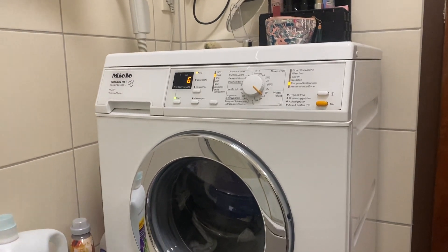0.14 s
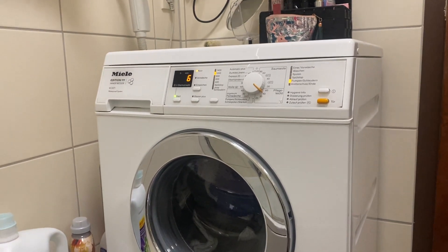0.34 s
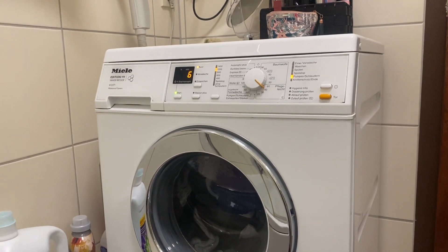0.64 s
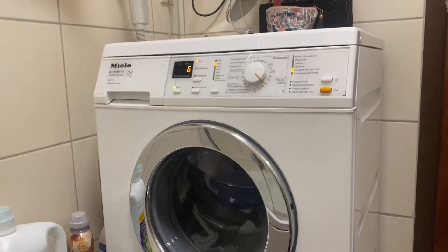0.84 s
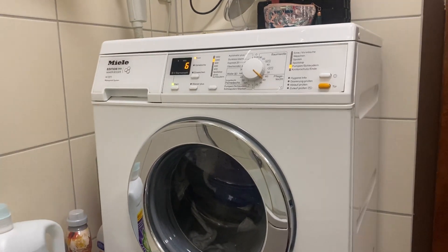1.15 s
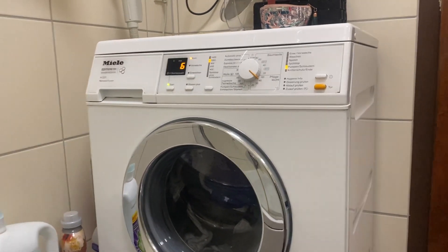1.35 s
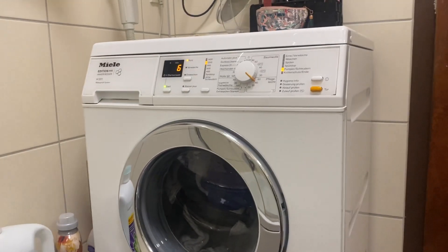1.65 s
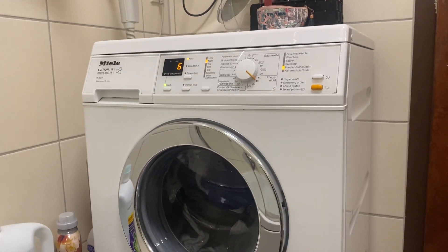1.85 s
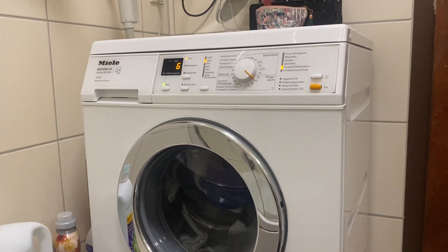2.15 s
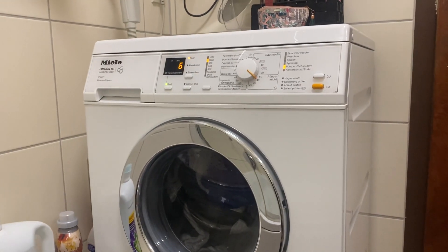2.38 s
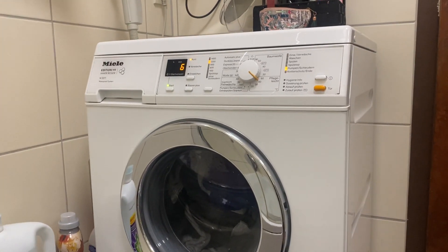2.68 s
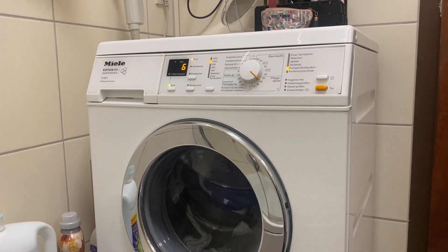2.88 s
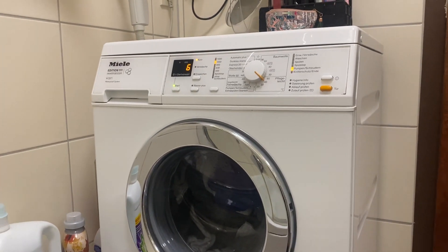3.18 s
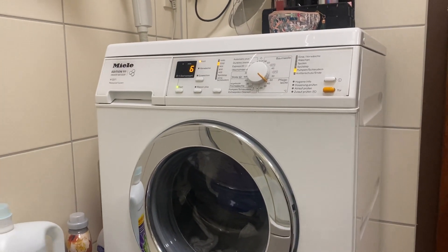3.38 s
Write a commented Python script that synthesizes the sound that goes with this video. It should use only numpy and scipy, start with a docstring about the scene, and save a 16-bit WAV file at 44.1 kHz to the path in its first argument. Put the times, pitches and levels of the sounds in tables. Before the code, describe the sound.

Washing machine drain pump hums and slurps in uneven gulps, then settles into a steady louder whir

```python
"""Washing machine pumping out

A washing machine pumps out its water in a small tiled room, a step from the microphone pair.
The drain pump hums in sine tones at multiples of the mains and slurps air in uneven gulps of shaped noise.
About halfway it draws air all the time: the hum jumps an octave and the churning becomes a steady whir.
Filtered noise makes the flow, the rumble, one dull knock and a thin hiss on the right."""
import sys
import numpy as np
from scipy import signal
from scipy.fft import rfft, irfft
from scipy.io import wavfile

SR = 44100
rng = np.random.default_rng(int(sys.argv[2]) if len(sys.argv) > 2 else 0)


def generate_wav(sig):
    """Save sig (samples, or channels by samples) to the path in sys.argv[1] as 16-bit PCM at SR."""
    pcm = np.round(np.clip(np.atleast_2d(sig).T, -1, 1) * 32767).astype(np.int16)
    wavfile.write(sys.argv[1], SR, pcm)


N = 155232

# Tone of the bright spray off the impeller. Each row: frequency in Hz, relative level in dB.
SPRAY_TONE = [(600, -28), (1500, -2), (2400, 0), (3200, -1), (4300, -8), (5500, -18.5), (7000, -23),
              (10000, -51.5)]


def amp(db):
    """Decibels to gain."""
    return 10 ** (np.asarray(db) / 20)


def unit(x):
    """Scales to rms 1, taken over both channels of a pair."""
    return x / np.sqrt(np.mean(x ** 2) + 1e-20)


def clock():
    """Time of every sample in seconds."""
    return np.arange(N) / SR


def bins():
    """Frequency of every spectrum bin in Hz."""
    return np.fft.rfftfreq(N, 1 / SR)


def curve(rows):
    """Joins (seconds, value) rows by straight lines."""
    return np.interp(clock(), *np.transpose(rows))


def spectrum(rows):
    """Reads (Hz, value) rows at every bin, along a logarithmic frequency axis."""
    hz, value = np.transpose(rows)
    return np.interp(np.log(bins() + 1), np.log(hz + 1), value)


def drift(rate_hz):
    """Slow random movement of rms 1: noise with a Gaussian low-pass and no constant part."""
    f = bins()
    slow = rfft(rng.standard_normal(N)) * np.exp(-(f / rate_hz) ** 2) * (f > 0)
    return unit(irfft(slow, N))


def swell(t, start, rise, hold, fade):
    """Rises in a straight line, holds, then dies away exponentially (all in seconds)."""
    attack = np.clip((t - start) / rise, 0, 1)
    return attack * np.exp(-np.maximum(t - start - rise - hold, 0) / fade)


def room(x):
    """Adds the dense, short reflections of the tiles as a decaying noise tail."""
    t60_s, tail_db = 0.24, 2.5
    t = np.arange(SR // 2) / SR
    tail = rng.standard_normal(len(t)) * amp(-60 * t / t60_s)
    reflections = amp(tail_db) * rfft(tail / np.linalg.norm(tail), N)
    return irfft(rfft(x) * (1 + reflections), N)


def radiate(pair, tone_rows):
    """Two unrelated signals pass the resonant cabinet and reach the two microphones, partly alike."""
    # Cabinet resonances. Each row: frequency in Hz, width in Hz, lift in dB.
    cabinet = [(426.7, 6.5, 6), (544, 13, 2), (680.5, 13, 7.5), (818.6, 18, 9), (896, 10, 1.5),
               (928, 17, 5), (949, 20, 6), (1063.4, 15, 9), (1194, 18, 5), (1309, 21, 7.5), (1354, 11, 6.5),
               (1540, 11, 3.5), (1602, 13, 8), (1824, 12, 4.5), (2150, 36, 2.5), (2396, 51, 6.5),
               (3093, 76, 7)]
    # How alike the microphones hear. Each row: frequency in Hz, likeness (limited to 0..1 below).
    likeness = [(60, 0), (220, 1.3), (400, 0.43), (730, 0.83), (1100, 0.5), (1600, 0.37), (4500, 0.49),
                (6700, 0.14), (9000, 0)]
    # Phase between the microphones. Each row: frequency in Hz, lead of the left in radians.
    left_lead = [(40, 0), (120, -1.43), (200, 0.4), (420, -0.5), (600, -2.5), (950, -5), (1380, -4.5),
                 (1850, -6.5), (2400, -8), (3000, -4), (3900, -5.5), (5100, -5), (6400, -1), (7100, 1.6),
                 (8000, 3.2), (10000, 4)]
    # Balance of the microphones. Each row: frequency in Hz, left over right in dB.
    balance = [(60, -9.5), (120, -0.5), (250, -5), (510, -6), (1050, -4), (2140, -5.5), (4370, -2.5),
               (8940, -0.5)]
    f = bins()
    ring_db = sum(db / (1 + (2 * (f - hz) / width) ** 2) for hz, width, db in cabinet)
    first, second = rfft(pair)
    same = np.clip(spectrum(likeness), 0, 1)
    left = same * first + np.sqrt(1 - same ** 2) * second
    left = left * np.exp(1j * spectrum(left_lead))
    lean = amp(spectrum(balance) / 2)
    stereo = np.array([left * lean, first / lean])
    return unit(irfft(stereo * amp(spectrum(tone_rows) + ring_db), N))


def sway(share):
    """Left and right gains as the hand-held microphone moves through the room's standing waves."""
    # Each row: time in seconds, left over right in dB at full share.
    sway_rows = [(0, 0), (.8, -2), (1.6, -5), (2.25, -4), (2.9, 1.2), (3.52, 2.5)]
    return amp(share * curve(sway_rows) * np.array([[.5], [-.5]]))


def splashes(per_s, spread_db, wash):
    """Tiny bursts of bubbles: random single-sample clicks over an even wash of noise, in the room."""
    size = amp(spread_db * np.minimum(rng.exponential(1, N), 3))
    clicks = rng.choice([-1, 1], N) * (rng.random(N) < per_s / SR)
    bursts = unit(size * clicks)
    return unit(room(bursts + wash * rng.standard_normal(N)))


def hiss():
    """A thin steady hiss on the right: unrelated high noise, 22 dB weaker on the left."""
    # Each row: frequency in Hz, relative level in dB.
    hiss_tone = [(7800, -52.5), (8030, 3.5), (8500, -2), (9200, -13.5), (10000, -32.5), (12000, -49.5)]
    right_db = -82.5
    noise = irfft(rfft(rng.standard_normal((2, N))) * amp(spectrum(hiss_tone)), N)
    return amp(right_db + np.array([[-22], [0]])) * unit(noise)


def water():
    """Even flow through the hose and lumpy rumble in the sump, both noise of wavering level."""
    # Tone of the flow. Each row: frequency in Hz, relative level in dB.
    flow_tone = [(20, -24), (60, 9), (120, 6), (230, 4), (350, 1.5), (520, -1), (700, -2.5), (1100, -3.5),
                 (1800, -11.5), (3100, -15), (4400, -17.5), (5500, -24.5), (7000, -33), (9500, -48.5),
                 (12000, -55.5)]
    # Tone of the rumble. Each row: frequency in Hz, relative level in dB.
    rumble_tone = [(20, -27), (45, -23), (70, -7), (120, 8), (170, -4.5), (240, -9.5), (320, -1.5),
                   (450, -6), (600, -8.5), (1000, -19), (3000, -70.5)]
    # Low rumble over time. Each row: time in seconds, level in dB before the wavering.
    rumble_rows = [(0, -50.5), (.2, -56), (.44, -54), (.66, -60), (.85, -47), (1.0, -52), (1.12, -55.5),
                   (1.28, -51.5), (1.45, -58), (1.65, -63.5), (1.82, -53), (1.91, -54.5), (2.03, -47),
                   (2.3, -46), (2.8, -45), (3.05, -46.5), (3.3, -45.5), (3.52, -50.5)]
    flow_gain = amp(-57.5 + 0.78 * drift(48))
    flow = flow_gain * radiate(rng.standard_normal((2, N)), flow_tone)
    rumble_gain = amp(curve(rumble_rows) + 1.5 * drift(20))
    rumble = rumble_gain * radiate(rng.standard_normal((2, N)), rumble_tone)
    return flow + rumble


def knock():
    """One dull thud of water in the pump: noise that starts at once and dies in milliseconds."""
    # Each row: frequency in Hz, relative level in dB.
    knock_tone = [(60, -21), (250, 20), (700, 22), (1200, 5), (2300, 8), (4000, -31), (9000, -65)]
    level_db = -41
    shape = swell(clock(), start=1.2865, rise=0.0011, hold=0, fade=0.0037)
    return amp(level_db) * shape * radiate(rng.standard_normal((2, N)), knock_tone)


def churn():
    """The impeller beats air and water together without a break: a coarse gurgle and fine spray."""
    # Tone of the gurgle. Each row: frequency in Hz, relative level in dB.
    gurgle_tone = [(200, -20), (450, 0.5), (680, -1), (1000, 0.5), (1300, -3), (1800, -4.5), (2500, -11),
                   (3100, -15), (4400, -25), (5500, -30), (10000, -57)]
    # Gurgle over time. Each row: time in seconds, level in dB before the wavering.
    gurgle_rows = [(1.76, -74), (1.82, -56.5), (1.99, -51), (2.05, -47.5), (2.14, -50.5), (2.3, -44.5),
                   (2.45, -48.5), (2.66, -48.5), (2.74, -47.5), (2.81, -44.5), (2.96, -53), (3.12, -50.5),
                   (3.29, -46.5), (3.42, -49), (3.52, -53.5)]
    # Spray over time. Each row: time in seconds, level in dB before the wavering.
    churn_spray_rows = [(1.76, -60), (1.87, -69), (2.05, -54.5), (2.3, -55), (2.6, -56.5), (2.8, -56),
                        (3.05, -56.5), (3.35, -56), (3.52, -55.5)]
    coarse = [splashes(per_s=700, spread_db=2, wash=0.43) for _ in range(2)]
    fine = [splashes(per_s=3000, spread_db=4.5, wash=0.78) for _ in range(2)]
    gurgle = amp(curve(gurgle_rows) + 1 * drift(35)) * radiate(coarse, gurgle_tone)
    spray = amp(curve(churn_spray_rows) + .9 * drift(30)) * radiate(fine, SPRAY_TONE)
    return gurgle + spray


def gulps():
    """Each gulp is a burst of coarse bubbles and the brighter spray that the impeller makes of them."""
    # Each row: start, rise, hold and fade in seconds, level of the bubbles in dB,
    # spray over bubbles in dB, lag of the spray in seconds.
    gulp_rows = [(-.02, .02, 0.033, 0.041, -64, 2.5, -0.01), (0.054, .02, 0.14, 0.13, -64, -20, 0.0053),
                 (.21, 0.049, .04, 0.16, -63, -0.5, -0.012), (0.377, 0.038, 0.062, 0.053, -54, -4, .03),
                 (0.52, .015, 0.024, 0.023, -63, 4, 0), (0.786, 0.027, 0.077, 0.095, -55, -6, 0.025),
                 (1.067, 0.018, .045, 0.034, -65, 0, .01), (1.237, .015, 0.048, 0.032, -58, -2.5, 0.017),
                 (1.35, .02, .07, .05, -72, 6.5, 0), (1.464, 0.021, 0.017, 0.078, -51.5, -4, 0.0011),
                 (1.523, .04, .03, .24, -55.5, -2.5, 0), (1.772, 0.021, 0.18, 0.079, -51, -2, -.018)]
    # Tone of the bubbles. Each row: frequency in Hz, relative level in dB.
    gulp_tone = [(200, -31), (500, 4.5), (900, 2.5), (1400, 4), (1850, 3), (2600, -8), (3300, -15),
                 (4400, -28), (7000, -57)]
    slap_db, slap_hz = 1.13, 35  # a gulp comes in small uneven slaps
    t = clock()
    coarse_gains = [amp(db) * swell(t, *shape) for *shape, db, _, _ in gulp_rows]
    spray_gains = [amp(db + spray_db) * swell(t - lag, *shape)
                   for *shape, db, spray_db, lag in gulp_rows]
    coarse = [splashes(per_s=1400, spread_db=2.0, wash=0.54) for _ in range(2)]
    spray = [splashes(per_s=4000, spread_db=3.0, wash=0.98) for _ in range(2)]
    # overlapping gulps add as power
    out = np.linalg.norm(coarse_gains, axis=0) * radiate(coarse, gulp_tone)
    out += np.linalg.norm(spray_gains, axis=0) * radiate(spray, SPRAY_TONE)
    return amp(slap_db * drift(slap_hz)) * out


def hum():
    """The pump motor's tones waver together in phase as the load on the rotor changes."""
    # Tone at twice the mains. Each row: time in seconds, level in dB before flutter and sway.
    low_rows = [(0, -45), (.16, -48.5), (.44, -43.5), (.5, -44), (.54, -51.5), (.62, -45), (.93, -42.5),
                (1.06, -46), (1.283, -43), (1.294, -53), (1.325, -50), (1.37, -51), (1.6, -50.5),
                (1.84, -42), (1.93, -46.5), (2.04, -50), (2.13, -44.5), (2.25, -49), (2.33, -42),
                (2.42, -49), (2.65, -56), (2.76, -49), (2.91, -49), (2.98, -54), (3.08, -48.5),
                (3.18, -62.5), (3.32, -48.5), (3.52, -51)]
    # Tone an octave up. Each row: time in seconds, level in dB before lift, flutter and sway.
    octave_rows = [(0, -57.5), (.27, -58), (.4, -58.5), (.7, -62), (.91, -48), (1.04, -57), (1.17, -54.5),
                   (1.23, -64), (1.35, -56), (1.8, -63.5), (1.89, -51.5), (1.94, -49), (1.99, -42),
                   (2.29, -39), (2.6, -40.5), (3.0, -40.5), (3.12, -35.5), (3.21, -41.5), (3.52, -40)]
    # Weak tones. Each row: multiple of the mains, level in dB when full of water,
    # level in dB when drawing air (both before flutter), left over right in dB, left lead in radians.
    overtone_rows = [(3, -71, -58.5, 0.5, -1.06), (5, -71.5, -66.5, -11, -2), (6, -63.5, -54.5, 1, -1.6),
                     (7, -67.5, -63, 0.5, -1.2), (8, -68.5, -60.5, -8, 0.94), (9, -64, -59.5, -2.5, -1.36)]
    # Where each strong tone sits: left over right in dB before sway, left lead in radians.
    low_place = (-0.46, -0.67)
    octave_place = (-3, -1.46)
    mains_hz = 50.015
    air_at_s, air_rise_s = 1.97, .2
    wobble_full_rad, wobble_air_rad, wobble_hz = 0.05, 0.068, 11  # the rotor lags and catches up
    slip_rad = 0.43  # the rotor settles at another angle once it runs in air
    flutter_db, overtone_flutter_db, octave_lift_db = 0.5, 2, 1.5

    air = np.clip((clock() - air_at_s) / air_rise_s + .5, 0, 1)  # 0 full of water, 1 drawing air
    wobble_rad = wobble_full_rad + air * (wobble_air_rad - wobble_full_rad)
    angle = 2 * np.pi * mains_hz * clock() + wobble_rad * drift(wobble_hz) - slip_rad * air

    def tone(db, lean_db, lead, order):
        """One sine at a multiple of the mains, placed by level and phase between the channels."""
        phase = round(order) * angle + 2 * np.pi * rng.random()
        left = amp(db + lean_db / 2) * np.sin(phase + lead)
        right = amp(db - lean_db / 2) * np.sin(phase)
        return np.sqrt(2) * np.array([left, right])  # levels are rms

    low_db = curve(low_rows) + flutter_db * drift(wobble_hz)
    octave_db = curve(octave_rows) + octave_lift_db + flutter_db * drift(wobble_hz)
    out = tone(low_db, *low_place, order=2) * sway(0.41)
    out += tone(octave_db, *octave_place, order=4) * sway(0.88)
    for order, full_db, air_db, lean_db, lead in overtone_rows:
        db = full_db + air * (air_db - full_db) + overtone_flutter_db * drift(wobble_hz)
        out += tone(db, lean_db, lead, order)
    return out


def scene():
    """Pump and water together; the water noise follows a share of the microphone's sway."""
    wet = water() + knock() + churn() + gulps()
    return hiss() + sway(0.31) * wet + hum()


def record(dry):
    """The recorder's band limit, without phase shift, with soft ends of 4 ms."""
    edge_hz = 12200
    ends = np.clip(np.minimum(clock(), clock()[::-1]) / .004, 0, 1)
    low_pass = signal.butter(12, edge_hz, fs=SR, output="sos")
    return signal.sosfiltfilt(low_pass, dry * ends)


dry = scene()
out = record(dry)
generate_wav(out)
```